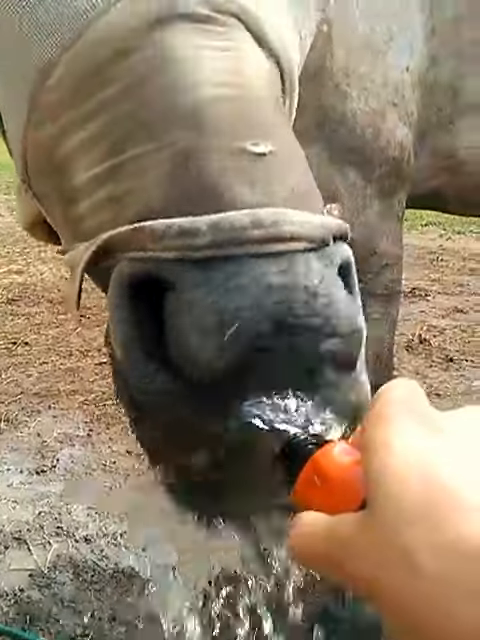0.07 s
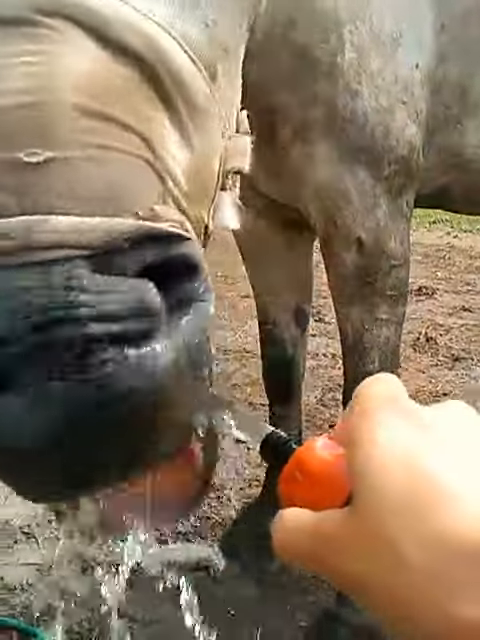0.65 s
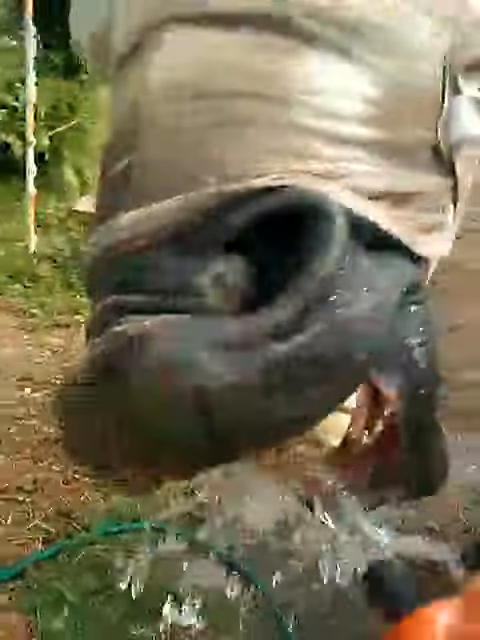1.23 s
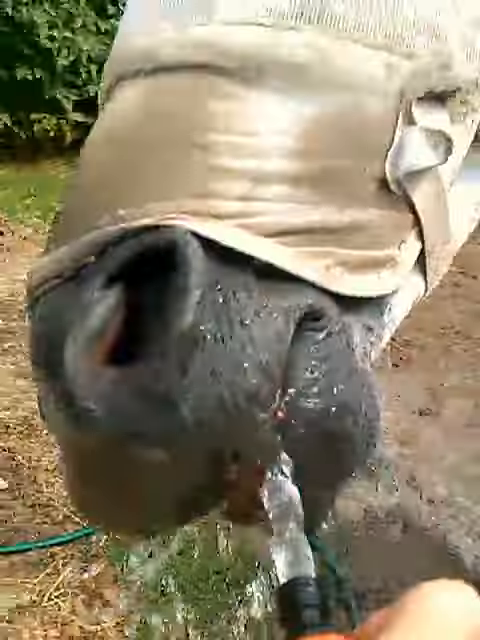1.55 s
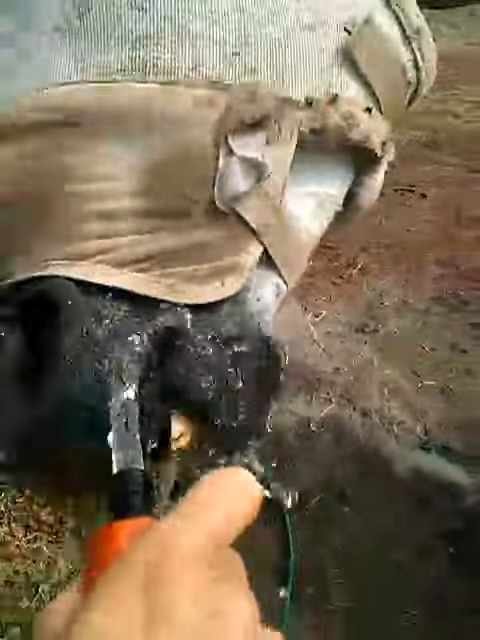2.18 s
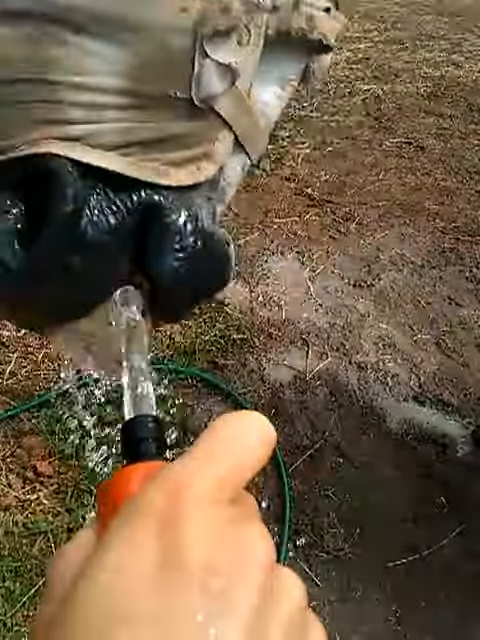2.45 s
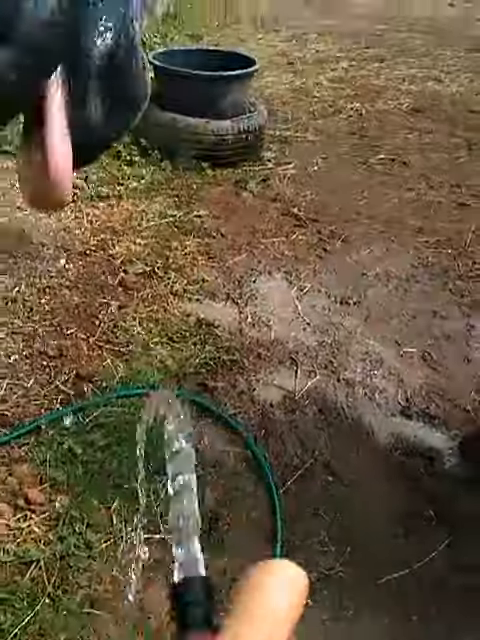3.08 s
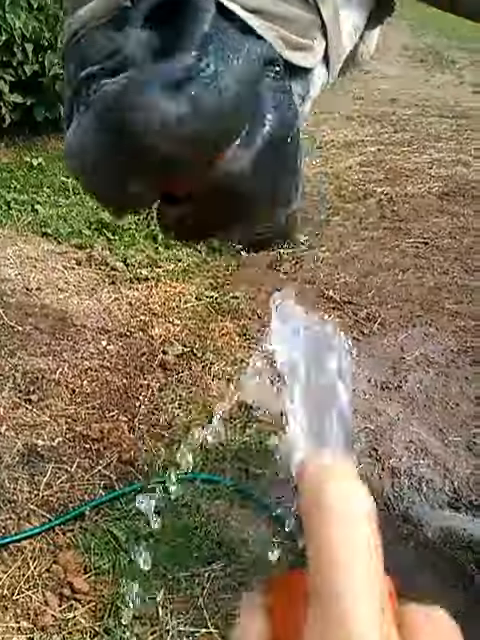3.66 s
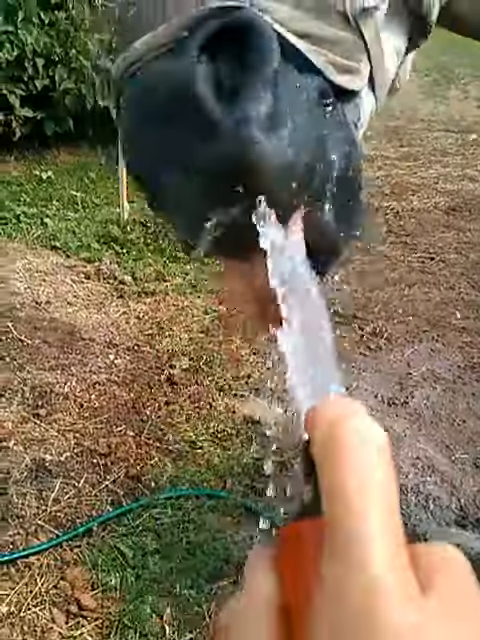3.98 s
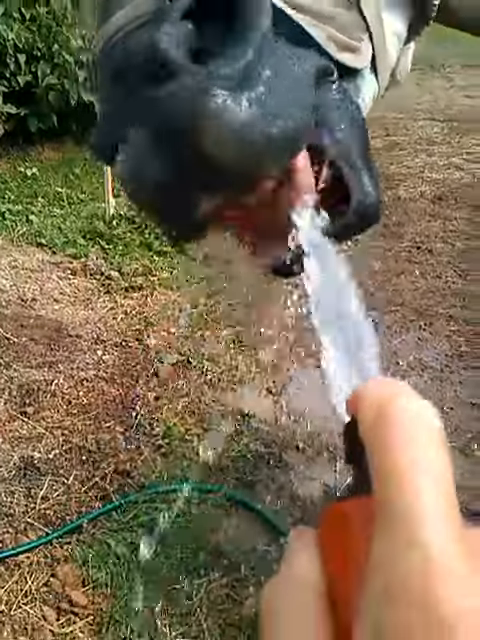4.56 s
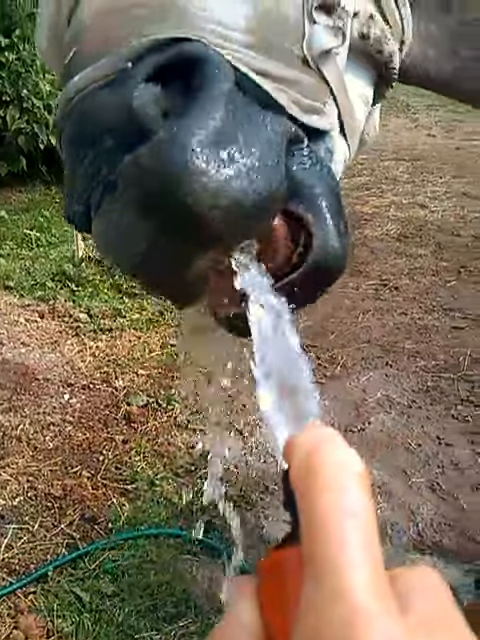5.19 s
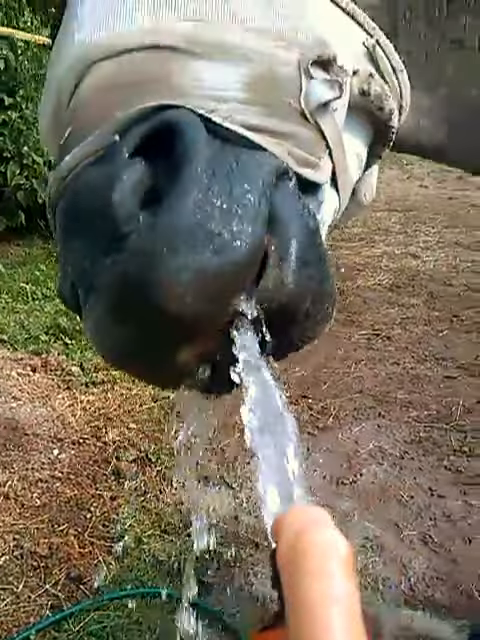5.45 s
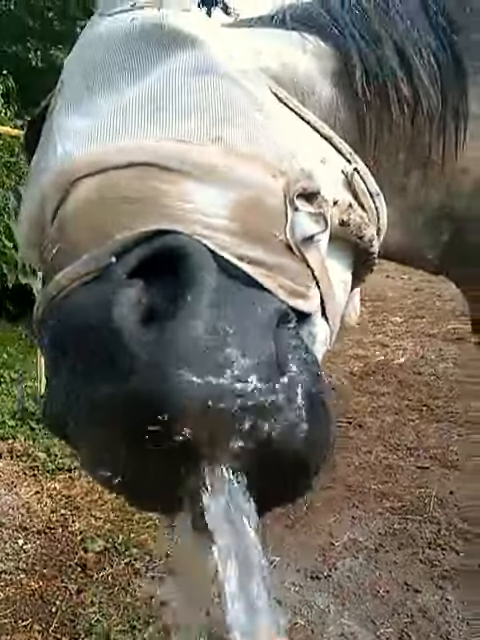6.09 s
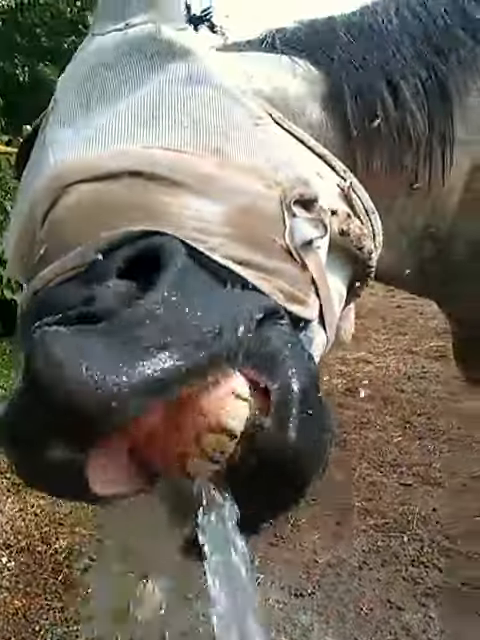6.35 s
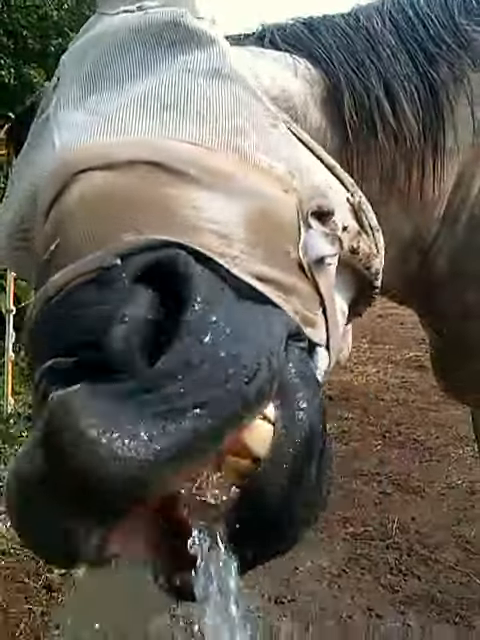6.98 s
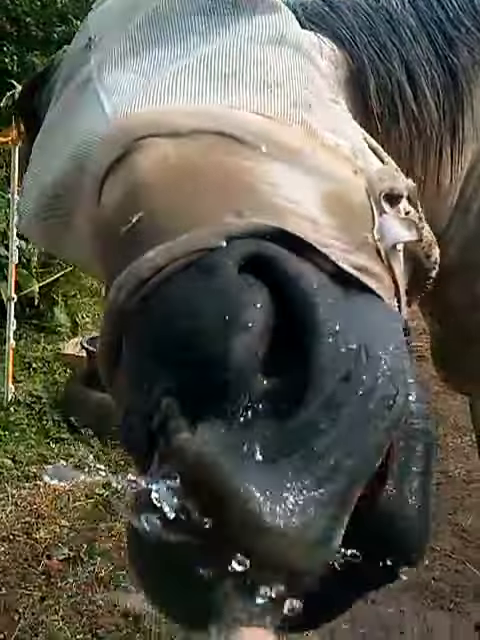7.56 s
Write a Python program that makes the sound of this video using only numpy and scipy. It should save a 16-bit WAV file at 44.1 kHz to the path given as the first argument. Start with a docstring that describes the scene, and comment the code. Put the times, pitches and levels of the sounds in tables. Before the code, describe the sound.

Hose water splashes and drips on a horse's muzzle, then becomes a hissing spray that gurgles in its mouth and sizzles on its teeth.

```python
"""A paddock in the open air, the camera's microphone an arm's length from a horse under a garden hose.
First, gouts of water slap on the lips and wet ground, and two drops knock on the camera itself.
About three seconds in, the horse turns away and the jet sloshes briefly in a puddle.
Then a finger flattens the jet into a hissing spray that gurgles in the hollow of the open mouth.
Last, the horse bares its teeth and the water sizzles and spits in the gaps."""
import sys
import numpy as np
from scipy import signal
from scipy.fft import rfft, irfft
from scipy.io import wavfile
from scipy.ndimage import uniform_filter1d, map_coordinates

SR = 44100
rng = np.random.default_rng(int(sys.argv[2]) if len(sys.argv) > 2 else 0)


def to_wav(sig):
    """Store sig (one row per channel, or 1-D mono) as 16-bit WAV at the path in sys.argv[1].

    Samples outside -1..1 are clipped; the rate is SR.
    """
    pcm = np.clip(np.atleast_2d(sig), -1, 1) * 32767
    pcm = np.round(pcm).astype(np.int16)
    wavfile.write(sys.argv[1], SR, pcm.T)  # frames by channels


N = 345303
TOP_HZ = 15900  # upper limit of the camera's microphone

# How hard the jet plays on the muzzle: time_s, level_db
JET_FLOW = [(0, -46), (1.15, -50.5), (1.85, -48), (2.22, -55.5), (2.45, -49.5), (2.8, -48), (3.1, -38.5),
            (3.9, -40.5), (4.1, -33), (4.36, -32.5), (4.44, -50), (4.56, -43.5), (5.0, -37.5), (5.5, -27.5),
            (5.68, -36.5), (6.4, -29.5), (6.6, -40), (7.35, -29), (7.75, -38.5)]
# Share of the jet that misses the horse and hits the ground: time_s, share (0-1)
JET_ON_GROUND = [(2.5, 0), (2.8, 0), (3.8, 1), (4.2, 0.1)]
# Level of the fine, high mist hiss at the reference spray level: time_s, level_db
JET_MISTING = [(0.6, -48.5), (1.4, -42), (2.4, -46.5), (2.85, -44.5), (3.85, -49), (4.3, -44.5),
               (5.2, -45.5), (7.4, -43), (7.83, -48)]
# Colours of the hissing spray, the slosh on the lips and the fine mist: frequency_hz, gain_db
SPRAY_COLOUR = [(300, -42), (1200, -52), (2100, -3.5), (2600, 3), (3100, 0), (3900, 3.5), (5800, 8),
                (6900, 0.5), (9000, -19), (15000, -21)]
SLOSH_COLOUR = [(150, -32), (400, -9), (800, -11.5), (1200, -3.5), (1900, 2), (2600, 4), (3400, -0.5),
                (6000, -11.5)]
MIST_COLOUR = [(3000, -23), (6500, 8.5), (8000, 5), (10500, 0.5), (15500, 1)]
def jet(reference_db=-37):
    """The jet on the muzzle, at arm's length: slosh and mist follow the spray; clumps swell all three."""
    spray_db = 20 * np.log10(np.hypot(amp(curve(JET_FLOW)), washes()))
    push_db = spray_db - reference_db
    on_ground = np.clip(curve(JET_ON_GROUND), 0, 1)
    slosh_db = -49 + 0.25 * push_db + 2.5 * on_ground + 0.6 * wobble(15)  # the puddle sloshes more
    mist_db = curve(JET_MISTING) + 0.65 * push_db + 1.5 * wobble(22)
    clumps_db = 1.43 * wobble(55) + 2.47 * wobble(280)
    spray = shower(per_s=1500, spread_db=4.5, centre_hz=4440, octaves=0.887, cycles=3.2)
    spray += 1.8 * rng.standard_normal(N)
    slosh = shower(per_s=900, spread_db=4.5, centre_hz=1694, octaves=1.44, cycles=1.08)
    slosh += 1.44 * rng.standard_normal(N)
    mist = shower(per_s=1900, spread_db=4, centre_hz=10270, octaves=0.38, cycles=1.6)
    mist += 1.7 * rng.standard_normal(N)
    water = (amp(spray_db - 3.5) * coloured(spray, SPRAY_COLOUR)
             + amp(slosh_db) * coloured(slosh, SLOSH_COLOUR)
             + amp(mist_db) * coloured(mist, MIST_COLOUR))
    return shimmer(amp(clumps_db) * water, depth_db=3.0)


def shower(per_s, spread_db, centre_hz, octaves, cycles, size=256):
    """Each drop or bubble rings briefly at its own strength, pitched around a steady or moving centre."""
    when, pitch, force, decay = rng.random((int(per_s * N / SR), 4)).T[:, :, None]
    start = (when * N).astype(int)
    hz = np.broadcast_to(centre_hz, N)[start] * 2 ** (octaves * (2 * pitch - 1))
    turns = np.clip(hz, 100, TOP_HZ) * np.arange(size) / SR
    strength = amp(spread_db * np.minimum(-np.log(1 - force), 4))
    envelope = np.exp(-turns / (cycles * (.5 + decay))) * (1 - np.exp(-2 * turns))
    rings = strength * envelope * np.sin(2 * np.pi * turns)
    samples = start + np.arange(size)
    return unit(np.bincount(samples.ravel(), rings.ravel(), N + size)[:N])


def shimmer(water, depth_db):
    """Random patches of gain over pitch and time make the spray's hiss flicker."""
    spectra = signal.stft(water, nperseg=512)[2]
    patches = uniform_filter1d(rng.standard_normal(spectra.shape), size=4, axis=0)
    patches = uniform_filter1d(patches, size=7, axis=1)
    return signal.istft(spectra * amp(depth_db * unit(patches)), nperseg=512)[1][:N]


# Gouts that slap down, then wash over the skin:
# start_s, slap_db, centre_hz, width_octaves, wash_db, wash_length_s
WATER_GOUTS = [(0.0076, -21, 3530, 0.85, -26.5, 0.024), (0.1554, -31, 7200, 0.37, -28.5, 0.039),
               (0.313, -30, 5600, 0.33, -40, 0.089), (0.496, -38.5, 2300, 1, -35, 0.057),
               (0.6574, -25.5, 5470, 0.25, -35.5, 0.05), (0.7857, -29, 3680, 0.27, -33.5, 0.056),
               (0.929, -33.5, 5850, 0.3, -38, 0.022), (0.9933, -30.5, 6400, 0.23, -37.5, 0.03),
               (1.153, -37, 1890, 1, -48.5, 0.11), (1.2957, -27, 4430, 0.72, -37, 0.091),
               (1.418, -31.5, 7500, 0.6, -39.5, 0.068), (1.549, -28.5, 1760, 0.47, -40.5, 0.066),
               (1.7114, -35, 6700, 0.8, -41.5, 0.1), (2.0147, -28, 6460, 0.44, -42, 0.097),
               (2.2772, -29.5, 3100, 0.99, -42.5, 0.08), (2.3957, -25.5, 6600, 0.33, -38, 0.083),
               (2.5395, -26, 4170, 0.23, -35.5, 0.019), (3.458, -27, 4870, 0.23, -33.5, 0.06),
               (4.5895, -23, 3870, 0.4, -29.5, 0.034), (4.61, -25, 3830, 0.56, -28, 0.035),
               (4.73, -26.5, 5200, 0.5, -30, 0.18), (5.079, -31, 3250, 0.99, -34.5, 0.034),
               (5.703, -26.5, 4140, 0.55, -31, 0.036), (5.9638, -27, 4400, 0.12, -36, 0.029),
               (6.1197, -23.5, 3600, 0.55, -49, 0.03), (6.5897, -28, 3970, 0.47, -35, 0.03),
               (6.758, -31, 4750, 0.5, -29, 0.12), (7.8108, -24.5, 3940, 0.35, -28, 0.02)]
def gouts():
    """Lumps of water slap on wet skin and mud."""
    out = np.zeros(N)
    for start_s, slap_db, centre_hz, width_octaves, _, _ in WATER_GOUTS:
        add(out, start_s, amp(slap_db) * splat(centre_hz, width_octaves, t60_s=0.023, spatter_db=-16.5))
    return out


def washes(attack_s=0.0027, drain_t60_s=0.19, lead_s=0.0074):
    """Gain of the water running over the skin: it rises just ahead of each gout, holds and drains."""
    age = np.arange(SR // 2) / SR
    rise = 1 - np.exp(-age / attack_s)
    power = np.zeros(N)
    for start_s, *_, wash_db, length_s in WATER_GOUTS:
        drained_db = 60 * np.maximum(age - length_s, 0) / drain_t60_s
        add(power, start_s - lead_s, (rise * amp(wash_db - drained_db)) ** 2)
    return np.sqrt(power)


def splat(centre_hz, width_octaves, t60_s, spatter_db, spatter_t60_s=0.11, skirt_db=-11, size=4096):
    """Water lands: a tick on contact, a burst as it flattens, then scattered droplets."""
    contact_t60_s, flatten_s = 0.003, 0.00048
    t = np.arange(size) / SR
    contact = amp(5.5 - 60 * t / contact_t60_s)
    burst = (amp(-60 * t / t60_s) + contact) * (1 - np.exp(-t / flatten_s))
    spatter = amp(spatter_db - 60 * t / spatter_t60_s + 3.9 * wobble(460, size=size))
    bounce_s = rng.uniform(0.000438, 0.0012)  # off the nearby muzzle or hand

    def colour_db(hz):
        band = 1 / (1 + (np.log2(hz / centre_hz) / (1.31 * width_octaves)) ** 4)
        skirt = width_octaves * amp(skirt_db) / (1 + (hz / 9000) ** 2)  # narrow splats spill less
        bass_cut = 1 / (1 + (190 / hz) ** 4)
        hollow_db = 3 * np.cos(2 * np.pi * hz * bounce_s)
        return 20 * np.log10((band + skirt) * bass_cut) + hollow_db

    slap = causal_filter((burst + spatter) * rng.standard_normal(size), colour_db, size=1024)
    return slap / np.std(slap[:400])


# Single large drops: start_s, level_db, centre_hz, width_octaves
LARGE_DROPS = [(0.0462, -31.5, 3600, 0.85), (0.359, -33, 5460, 0.44), (0.392, -35, 4500, 0.9),
               (0.5574, -33.5, 3300, 0.57), (0.6355, -35, 1500, 0.56), (0.697, -30.5, 5260, 0.45),
               (1.4653, -33.5, 7150, 0.45), (1.5016, -32, 3920, 0.13), (1.749, -34.5, 2770, 0.17),
               (1.781, -30, 2650, 0.15), (2.399, -29, 2860, 0.23), (2.901, -34, 4100, 0.49),
               (2.9243, -32.5, 4030, 0.59), (2.9556, -25, 4600, 0.61), (3.0155, -31.5, 4250, 0.21),
               (3.031, -28.5, 3570, 0.5), (3.0568, -31.5, 4040, 0.5), (3.076, -36, 4100, 0.5),
               (3.1143, -27.5, 4640, 0.25), (3.2018, -26, 5560, 0.14), (3.2913, -26.5, 2090, 0.63),
               (3.3103, -28, 4870, 0.24), (3.429, -29.5, 4070, 0.48), (3.7266, -31.5, 2290, 0.5),
               (3.8102, -37, 4760, 0.3), (3.8875, -27.5, 4700, 0.32), (3.952, -35, 5500, 0.4),
               (4.069, -28, 2110, 0.33), (4.1561, -23.5, 5270, 0.15), (4.2101, -27, 3940, 0.35),
               (4.2401, -25.5, 3680, 0.74), (4.3642, -25, 5300, 0.1), (4.4907, -35, 4970, 0.22),
               (4.65, -24.5, 2470, 0.69), (4.7847, -26, 4840, 0.3), (4.8313, -29, 4270, 0.45),
               (5.3105, -26.5, 4500, 0.58), (5.379, -27, 2920, 0.23), (5.4406, -25, 5600, 0.52),
               (5.521, -24.5, 3600, 0.41), (5.5515, -24.5, 4000, 0.3), (5.5977, -24.5, 3570, 0.25),
               (5.6263, -26.5, 2180, 0.2), (5.7515, -25.5, 5940, 0.13), (6.051, -25.5, 4000, 0.17),
               (6.14, -29, 4600, 0.14), (6.2687, -30, 1450, 0.28), (6.4595, -27, 2750, 0.76),
               (6.6807, -29.5, 3900, 0.41), (6.849, -32, 2400, 0.39)]
def drips():
    """Large drops land near the microphone, each with a dry tick."""
    out = np.zeros(N)
    for start_s, level_db, centre_hz, width_octaves in LARGE_DROPS:
        add(out, start_s, amp(level_db) * splat(centre_hz, width_octaves, t60_s=0.017, spatter_db=-19))
    return out


# Spits between the teeth: start_s, level_db, pitch_hz
TOOTH_SPITS = [(6.3956, -21.5, 5200), (6.406, -24, 5100), (6.9607, -19, 4870), (7.0604, -18.5, 3940),
               (7.178, -25, 5400), (7.2022, -25, 4840), (7.2695, -21.5, 5550), (7.302, -20, 5200),
               (7.3715, -29, 4840), (7.397, -19, 5050), (7.4728, -37, 4180), (7.6155, -31.5, 5530)]
def spits():
    """The jet spits in the gaps of the teeth, which give it a pitch."""
    out = np.zeros(N)
    for start_s, level_db, pitch_hz in TOOTH_SPITS:
        spit = splat(pitch_hz, width_octaves=0.14, t60_s=0.013, spatter_db=-21)
        add(out, start_s, amp(level_db) * spit)
    return out


# The puddle or the mouth filling (pitch rises) and draining (pitch falls):
# start_s, length_s, start_hz, end_hz, level_db
HOLLOW_GULPS = [(3.28, 0.64, 1730, 2030, -50.5), (4.03, 0.33, 2300, 2830, -52),
                (4.8, 0.16, 2280, 2680, -38), (5.33, 0.29, 1670, 2800, -38), (5.74, 0.47, 1900, 870, -52),
                (6.17, 0.12, 890, 1300, -50), (6.27, 0.33, 1800, 2700, -40), (6.55, 0.12, 1300, 653, -51.5),
                (6.66, 0.17, 624, 1030, -46.5), (6.76, 0.2, 1410, 2280, -39.5)]
def gulps(fade_share=0.58):
    """Bubbles ring near the gliding pitch of a hollow as it fills or drains."""
    t = np.arange(N) / SR
    hollow_hz = np.full(N, float(HOLLOW_GULPS[0][2]))
    gain = np.zeros(N)
    for start_s, length_s, start_hz, end_hz, level_db in HOLLOW_GULPS:
        during = (t >= start_s) & (t < start_s + length_s)
        hollow_hz[during] = np.geomspace(start_hz, end_hz, during.sum())
        add(gain, start_s, amp(level_db) * signal.windows.tukey(int(length_s * SR), fade_share))
    return gain * shower(per_s=900, spread_db=4.5, centre_hz=hollow_hz, octaves=0.39, cycles=3.5, size=900)


# The sizzle as the teeth are bared: time_s, level_db
SIZZLE_LEVEL = [(5.9, -62), (6.3, -50), (6.75, -42.5), (6.97, -31.5), (7.48, -32), (7.83, -49)]
# Its colour: frequency_hz, gain_db
SIZZLE_COLOUR = [(1500, -45), (3100, -10), (3950, 4), (4550, 3), (5450, -15), (6400, -20), (10000, -29)]
def sizzle():
    """The jet breaks on the teeth in a dense, bright shower."""
    droplets = shower(per_s=900, spread_db=6.0, centre_hz=4660, octaves=0.38, cycles=1.7, size=400)
    return amp(curve(SIZZLE_LEVEL)) * coloured(droplets, SIZZLE_COLOUR)


# Drops that hit the camera, right at the microphone: start_s, thud_db, boom_db, crack_db
CAMERA_HITS = [(0.1727, -17.5, -60, -28), (0.8164, -17.5, -24, -11)]
# Modes of the case (thud), the flexing body (boom) and the port (crack): pitch_hz, level_db, t60_s
CASE_MODES = [(405, -5, 0.017), (583, 18.5, .014), (856, 23, 0.011), (1046, 6, 0.047)]
BODY_MODES = [(192, -10, 0.14), (283, 9, 0.019)]
PORT_MODES = [(2560, 0, 0.02), (2850, -4, 0.03), (4060, 5, 0.016), (4600, 16, 0.0032), (5500, 2, 0.0068)]
def knocks():
    """A drop on the camera thuds through the case, then bursts beside the microphone port."""
    out = np.zeros(N)
    for start_s, thud_db, boom_db, crack_db in CAMERA_HITS:
        add(out, start_s, amp(thud_db) * ring(CASE_MODES) + amp(boom_db) * ring(BODY_MODES))
        burst = splat(3400, 0.44, t60_s=0.023, spatter_db=-18, spatter_t60_s=.05, skirt_db=-4)
        add(out, start_s + .0008, amp(crack_db) * (ring(PORT_MODES) + .5 * burst))
    bass_cut = signal.butter(6, 195, "high", fs=SR, output="sos")  # the small case passes no bass
    return signal.sosfilt(bass_cut, out)


def ring(modes, size=4096):
    """Damped modes after one blow, at rms 1 over the first hundredth of a second."""
    t = np.arange(size) / SR
    ringing = sum(amp(level_db + rng.normal(0, 1) - 60 * t / t60_s) * np.sin(2 * np.pi * pitch_hz * t)
                  for pitch_hz, level_db, t60_s in modes)
    return ringing / np.std(ringing[:SR // 100])


# Air pockets between the lips, and thin squirts that close on their air and zip upwards:
# start_s, length_s, start_hz, end_hz, level_db
LIP_POCKETS = [(0.508, 0.052, 833, 1145, -40.5), (1.167, 0.074, 1010, 700, -48.5),
               (1.56, 0.021, 212, 183, -43), (1.819, 0.027, 600, 740, -45), (3.72, 0.27, 331.6, 381, -60),
               (3.988, 0.0565, 481, 270, -43.5), (4.376, 0.024, 1200, 1140, -37),
               (4.727, 0.17, 240, 230, -55), (4.923, 0.0062, 850, 716, -35.5), (6.12, 0.07, 196, 201, -53),
               (6.264, 0.005, 257, 200, -41.5), (6.455, 0.019, 2580, 2650, -29)]
THIN_SQUIRTS = [(0.4645, 0.0071, 3250, 9150, -28), (0.476, 0.0064, 3400, 9100, -40),
                (0.9168, 0.0073, 2800, 7000, -21.5)]
def gurgles(pockets, roughness):
    """Water stirs pockets of air whose pitch slides as they shrink or open."""
    out = np.zeros(N)
    for start_s, length_s, start_hz, end_hz, level_db in pockets:
        size = int(length_s * SR)
        phase = 2 * np.pi * np.cumsum(np.geomspace(start_hz, end_hz, size)) / SR
        stir_hz = roughness * start_hz  # higher pockets have wider resonances
        tone = wobble(stir_hz, size) * np.sin(phase) + wobble(stir_hz, size) * np.cos(phase)
        add(out, start_s, amp(level_db) * unit(tone * signal.windows.tukey(size, .5)))
    return out


# Colour of the stray drops around the muzzle: frequency_hz, gain_db
PATTER_COLOUR = [(200, -26.5), (900, -15), (2300, -4), (5800, 2.5), (7200, -11.5), (15000, -17)]
def patter(per_s=130, spread_db=6, rise_s=0.00046, fall_s=0.0014, ceiling_db=-39):
    """Stray drops tick for a few milliseconds each; more flow throws them harder, up to a ceiling."""
    when, force = rng.random((int(per_s * N / SR), 2)).T
    strength = amp(spread_db * np.minimum(-np.log(1 - force), 3))
    energy = np.bincount((when * N).astype(int), strength ** 2, N)
    for lag_s in (rise_s, fall_s):
        energy = signal.lfilter([1], [1, -np.exp(-1 / (lag_s * SR))], energy)
    ticks = coloured(np.sqrt(energy) * rng.standard_normal(N), PATTER_COLOUR)
    return amp(np.minimum(curve(JET_FLOW) - 1.5, ceiling_db)) * ticks


# Fingers shifting on the camera: start_s, length_s, level_db
GRIP_SHIFTS = [(0.437, 0.16, -45), (4.099, 0.49, -68)]
def handling():
    """A shift of grip reaches the microphone as a soft rumble."""
    colour = [(15, -18), (35, -7.0), (90, -15.5), (250, -26.5), (900, -42)]  # frequency_hz, gain_db
    out = np.zeros(N)
    for start_s, length_s, level_db in GRIP_SHIFTS:
        size = int(length_s * SR)
        rumble = coloured(rng.standard_normal(size), colour, size=8192)
        add(out, start_s, amp(level_db) * unit(rumble * np.hanning(size)))
    return out


# Colour of the air over the paddock: frequency_hz, gain_db
AIR_COLOUR = [(13, -31), (22, -6), (59, 4), (118, -6), (204, -4.5), (420, -8), (1500, -5.5), (1950, -8),
              (3300, -120)]
def paddock_air(level_db=-52.5):
    """Low, steady outdoor air, all around the microphone."""
    return amp(level_db) * coloured(rng.standard_normal(N), AIR_COLOUR, size=16384)


def amp(db):
    """Decibels to gain."""
    return 10 ** (np.asarray(db) / 20)


def unit(x):
    """Scaled to rms 1."""
    return x / np.sqrt(np.mean(x ** 2) + 1e-20)


def add(track, start_s, sound):
    """Mix a sound into a track at a time."""
    i = max(round(start_s * SR), 0)
    track[i:i + len(sound)] += sound[:max(len(track) - i, 0)]


def curve(rows):
    """Rows of time_s, value joined by straight lines, one value a sample."""
    time_s, values = np.transpose(rows)
    return np.interp(np.arange(N) / SR, time_s, values)


def wobble(per_s, size=N):
    """A smooth random curve with per_s knots a second."""
    knots = rng.standard_normal(int(size * per_s / SR) + 4)
    return map_coordinates(knots, [np.arange(size) * per_s / SR])


def causal_filter(x, gain_db, size):
    """Filter by a dB function of frequency, ringing only after each impact (minimum phase)."""
    gain = amp(gain_db(np.fft.rfftfreq(size, 1 / SR) + 1))
    cepstrum = irfft(np.log(gain + 1e-6))
    cepstrum[1:size // 2] *= 2
    cepstrum[size // 2 + 1:] = 0
    impulse_response = irfft(np.exp(rfft(cepstrum)))
    return signal.oaconvolve(x, impulse_response)[:len(x)]


def coloured(x, colour, size=2048):
    """x filtered by rows of frequency_hz, gain_db, at rms 1."""
    hz, db = np.transpose(colour)
    return unit(causal_filter(x, lambda f: np.interp(np.log(f), np.log(hz), db), size))


def scene():
    """One microphone close to the horse, in the open air with no reverberation."""
    water = jet() + gulps() + sizzle() + patter() + gouts() + drips() + spits() + knocks()
    lips = gurgles(LIP_POCKETS, roughness=0.275) + gurgles(THIN_SQUIRTS, roughness=0.43)
    return (water + lips + paddock_air() + handling())[None]


def record(dry):
    """The camera clips at full scale and keeps nothing above its band limit."""
    clipped = np.clip(dry, -1, 1)
    in_band = np.fft.rfftfreq(N, 1 / SR) < TOP_HZ
    return irfft(rfft(clipped) * in_band, N)


dry = scene()
out = record(dry)
to_wav(out)
```